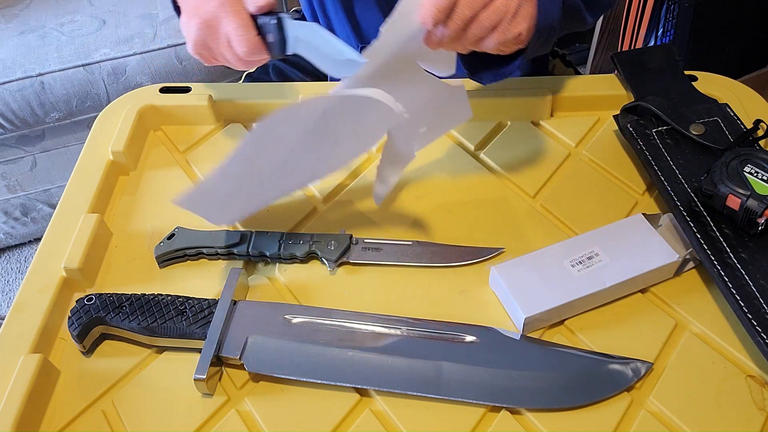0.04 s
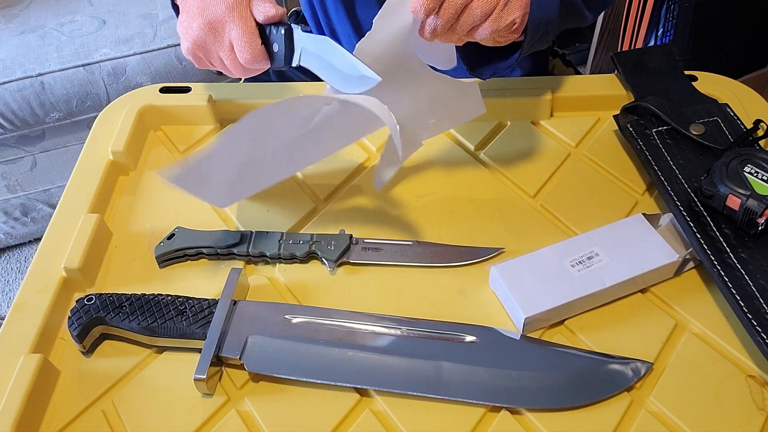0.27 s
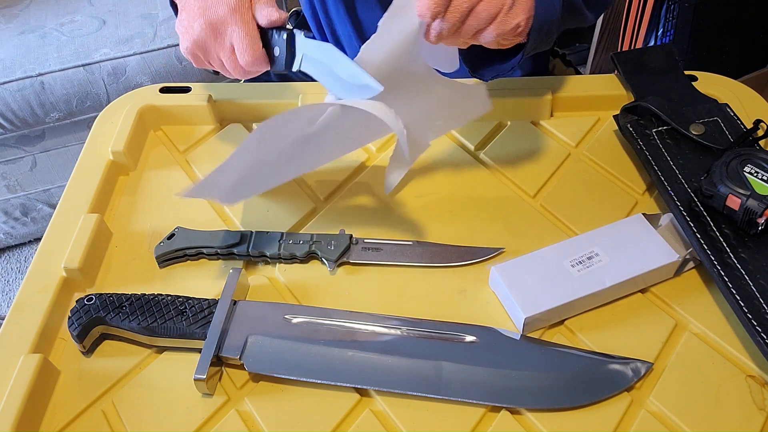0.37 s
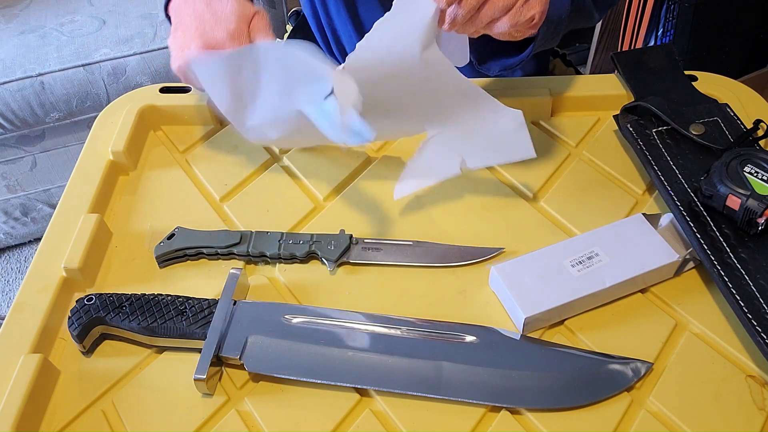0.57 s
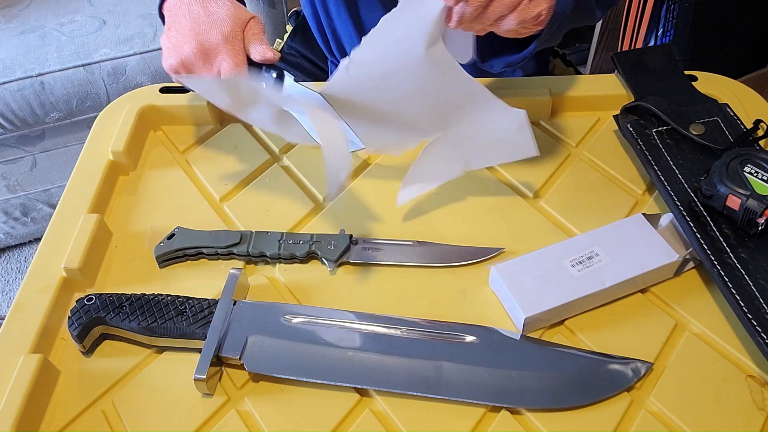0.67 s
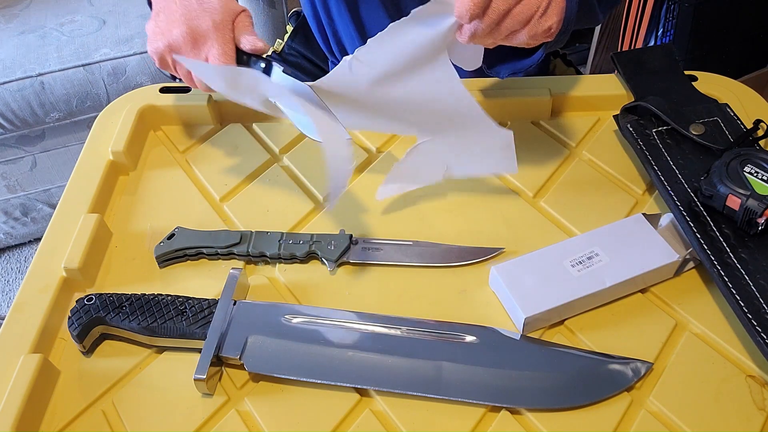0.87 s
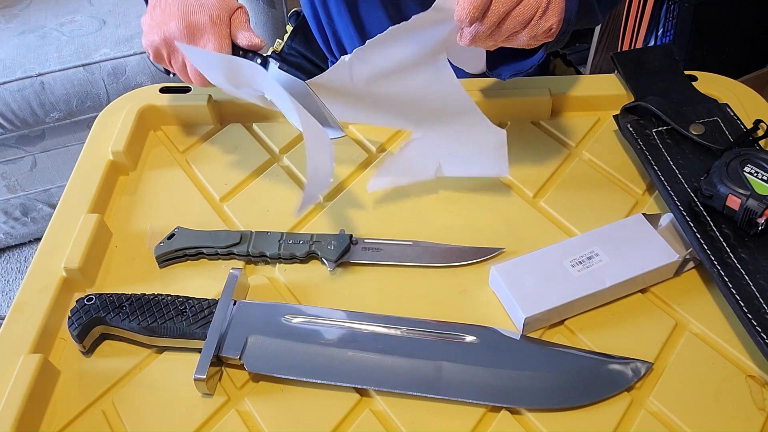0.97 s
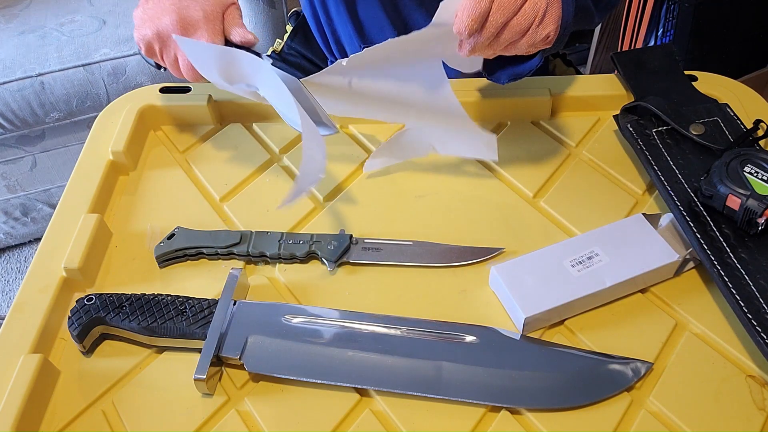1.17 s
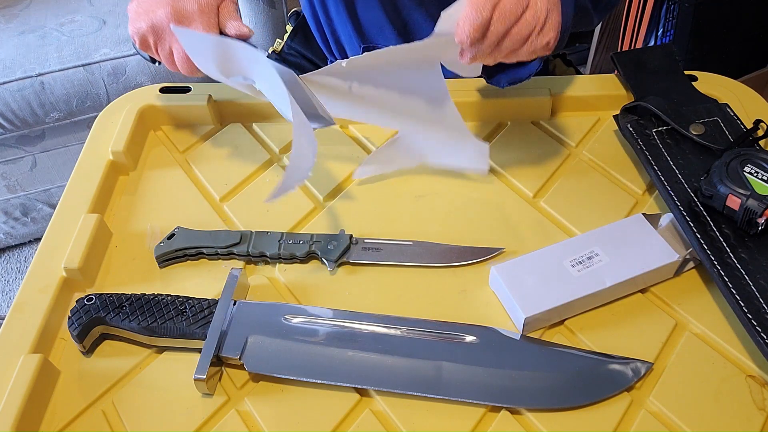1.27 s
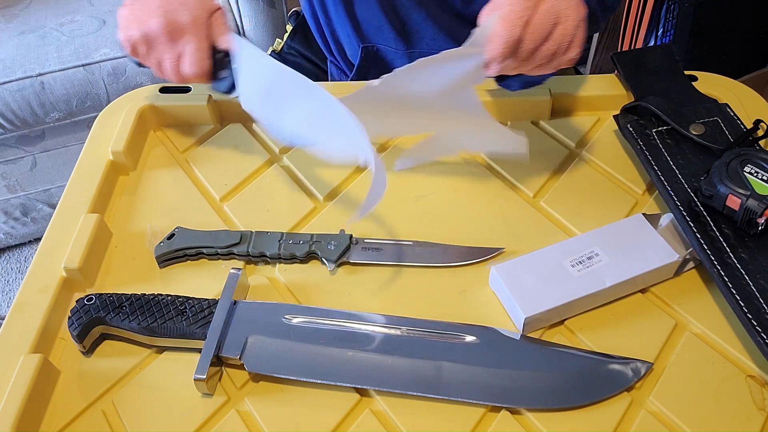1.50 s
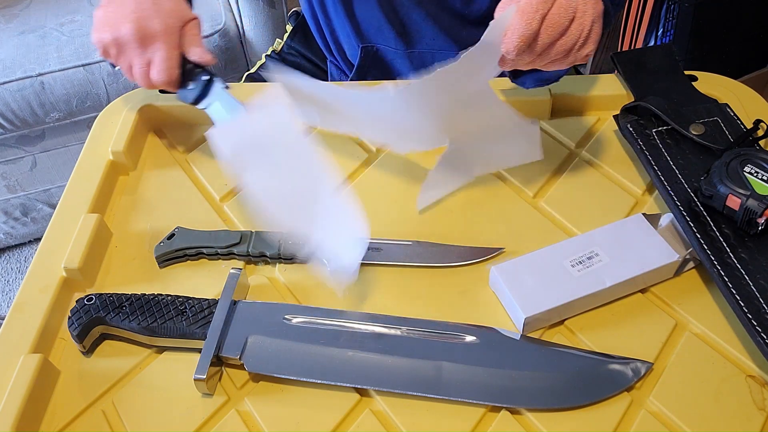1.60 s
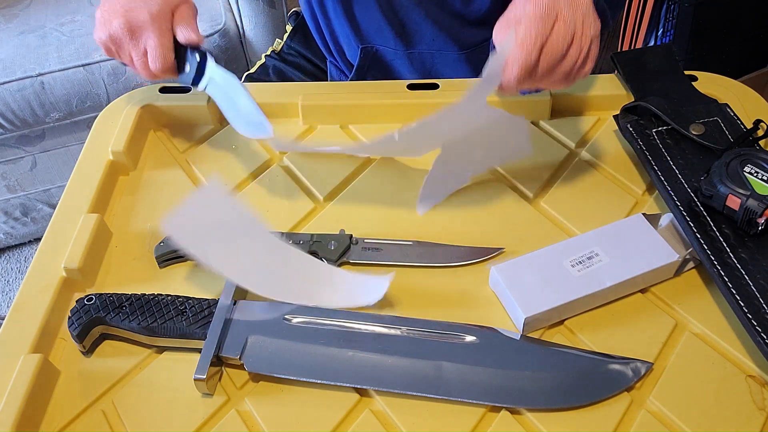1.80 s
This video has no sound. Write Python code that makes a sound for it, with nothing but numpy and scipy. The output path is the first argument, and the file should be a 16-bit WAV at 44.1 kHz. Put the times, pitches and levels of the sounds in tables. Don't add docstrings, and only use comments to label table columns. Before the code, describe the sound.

Paper being sawn and torn by a blade, crackling in uneven pulls, heard close up indoors

```python
import sys
import numpy as np
from scipy import signal
from scipy.io import wavfile
from scipy.ndimage import uniform_filter1d

SR = 44100
rng = np.random.default_rng(int(sys.argv[2]) if len(sys.argv) > 2 else 0)


def pcm_store(signal):
    levels = np.round(np.clip(np.atleast_2d(signal), -1, 1) * 32767)
    wavfile.write(sys.argv[1], SR, levels.astype(np.int16).T)


def convert_level_to_amplitude(level_db):
    exponent = np.asarray(level_db, float) / 20
    return 10 ** exponent


N = 81585


def evened(x):
    return x / np.sqrt(np.mean(x ** 2) + 1e-20)


def read(points, hz):
    f, value = np.transpose(points)
    return np.interp(np.log(hz + 1), np.log(f + 1), value)


def colour(x, points):
    hz = abs(np.fft.fftfreq(4096, 1 / SR))
    log_gain = np.log(convert_level_to_amplitude(read(points, hz)))
    spectrum = np.exp(np.conj(signal.hilbert(log_gain)))
    taps = np.fft.ifft(spectrum).real[:2048]
    return signal.oaconvolve(x, taps)[:len(x)]


def resonate(x, hz, width):
    r = np.exp(-np.pi * abs(width) / SR)
    pole = r * np.exp(2j * np.pi * hz / SR)
    return 2 * signal.lfilter([1 - r], [1, -pole], x).real


def wavelet(hz, cycles):
    turns = np.arange(round(4 * abs(cycles) * SR / hz) + 2) * hz / SR
    u = turns / cycles
    return np.sin(2 * np.pi * turns) * u * np.exp(1 - u) * np.exp(-(u / 2) ** 2)


def add(mix, s, sound):
    part = mix[round(s * SR):][:len(sound)]
    part += sound[:len(part)]


def fibres(per_s, spread_db):
    u = rng.random((N, 3))
    size = convert_level_to_amplitude(-spread_db * np.log(u[:, 1] + 0.032))
    return np.sign(u[:, 0] - .5) * size * (u[:, 2] < per_s / SR)


# (time [s], force level [dB], edge fizz against the sheet's body [dB])
ENTRY = [
    (0, -62, 4.5),
    (.06, -60, -0.5),
    (.088, -55, 8.5),
    (.143, -40.5, -4.5),
    (.165, -42.5, -4),
    (.198, -55, 2.5),
]
FIRST = [
    (.198, -40, -10),
    (0.204, -40, -1),
    (0.251, -30.5, -1.5),
    (.27, -40, 1.7),
    (0.29, -53, 2),
    (0.306, -39, -4),
    (0.325, -43.5, 5),
]
SECOND = [
    (0.331, -51.5, 4.5),
    (0.34, -37, 0.5),
    (0.362, -31.5, -0.5),
    (0.391, -31.5, -2.5),
    (0.414, -39, -1),
    (.432, -29, -2),
    (0.444, -39.5, -5),
    (0.493, -42, 5.5),
    (0.551, -39.5, 0),
]
LONG = [
    (0.551, -42.5, -16),
    (0.562, -32.5, 3.5),
    (0.619, -26.5, -1),
    (.67, -30.5, 0.5),
    (0.719, -29, -1.5),
    (.75, -51, -6.5),
    (.785, -73, 10),
    (.797, -61, 6),
    (.81, -64, 2),
]
RIP = [
    (0.811, -46, 10),
    (0.812, -48, 0),
    (0.821, -41, -2),
    (0.825, -34, -2),
    (0.844, -27, -9),
    (0.875, -20.5, -7),
    (0.908, -24, -5.5),
    (0.948, -38.5, -7),
    (1.021, -76, 16),
]
KNOCK = [
    (1.029, -44, -30),
    (1.032, -39, -36),
    (1.05, -41, -21),
    (1.075, -62, -6),
]
STUTTER = [
    (1.074, -69, -0.16),
    (1.082, -42, -1.1),
    (1.096, -41, -0.87),
    (1.106, -73, 0.6),
    (1.124, -49.5, 0.96),
    (1.128, -45, 1),
    (1.174, -38.5, -0.37),
    (1.181, -63, -1),
]
DRAG = [
    (1.251, -57, -10),
    (1.262, -57, 9),
    (1.3, -59.5, 5),
    (1.345, -50.5, -6.5),
    (1.358, -56.5, 10.5),
    (1.422, -60.5, -0.5),
    (1.428, -41.5, -15),
    (1.44, -41, -1),
]
LAST = [
    (1.441, -26, -9.5),
    (1.46, -37.5, -3),
    (1.481, -31, 2.5),
    (1.525, -32.5, 7.5),
    (1.565, -31, 7.5),
    (1.591, -28.5, -7.5),
    (1.622, -38, -10),
    (1.671, -48, 1.5),
]
FALL = [
    (1.67, -48, 1.8),
    (1.685, -46, 2.8),
    (1.72, -45.5, 2.2),
    (1.735, -52, 0.68),
    (1.8, -57, 1.8),
    (1.812, -50, 1.1),
    (1.85, -61.5, 6.1),
]


def sawing():
    t, force, edge = np.arange(N) / SR, np.zeros(N), np.zeros(N)
    for pull in (ENTRY, FIRST, SECOND, LONG, RIP, KNOCK, STUTTER, DRAG, LAST, FALL):
        s, db, bite_db = np.transpose(pull)
        force = np.maximum(force, convert_level_to_amplitude(np.interp(t, s, db, -120, -120)))
        edge = np.maximum(edge, convert_level_to_amplitude(np.interp(t, s, db + bite_db, -120, -120)))
    clump_s, clump_db = .003, 2
    clump = convert_level_to_amplitude(clump_db * evened(resonate(rng.standard_normal(N), 0, 0.67 / clump_s)))
    low = fibres(per_s=4500, spread_db=3) * clump
    high = fibres(per_s=9000, spread_db=2.5) * np.sqrt(clump)
    return low / np.std(low) * force, high / np.std(high) * edge


# (frequency [Hz], level [dB])
BODY = [(70, -31), (170, -14), (320, -7), (560, -5), (1700, -5), (2300, -8.5), (2800, -9), (6000, -52.5)]
# (start time [s], [(frequency [Hz], width [Hz], level [dB])])
SHEET = [
    (0, [(328, 130, -2.5), (645, 23, 6), (790, 33, 6.5), (1150, 40, -2), (1476, 55, 6), (1870, 58, 7), (2250, 50, 7)]),
    (0.548, [(349, 42, 4.5), (810, 120, 0.5), (1030, 130, 0.5), (1436, 20, 6), (1740, 140, 7.5), (2142, 37, 12), (2490, 130, -2)]),
    (.8, [(410, 40, 4), (653, 25, 5), (867, 56, -1), (1450, 58, 0), (1727, 48, 11), (300, 25, 2), (2150, 210, 5)]),
    (1.02, [(317, 74, 12), (1030, 37, -3), (1230, 67, -10), (1880, 190, 8), (2090, 110, 5.5)]),
    (1.448, [(320, 51, 4), (688, 85, 8.5), (1430, 77, 3), (1810, 420, 7.5), (1990, 140, 5), (2640, 100, 8)]),
]


def buckling_sheet(low):
    t, unit, sheet = np.arange(N) / SR, np.eye(1, 4096)[0], np.zeros(N)
    stage = np.searchsorted([s for s, _ in SHEET], t, "right") - 1
    ring_db, grain_cycles, grain_db = 2.5, 0.63, -10
    for k, (_, modes) in enumerate(SHEET):
        rings = sum(convert_level_to_amplitude(db) * resonate(unit, hz, width) for hz, width, db in modes)
        body = evened(colour(unit, BODY)) + convert_level_to_amplitude(ring_db) * evened(colour(rings, BODY))
        sheet += signal.oaconvolve(low * (stage == k), body / np.linalg.norm(body))[:N]
    patch = rng.integers(0, 16, N)
    for k, hz in enumerate(np.geomspace(330, 2250, num=16)):
        grain = wavelet(hz, grain_cycles)
        gain = convert_level_to_amplitude(grain_db + read(BODY, hz)) * np.sqrt(hz / 1000) / np.linalg.norm(grain)
        sheet += signal.oaconvolve(low * (patch == k), gain * grain)[:N]
    return 0.72 * sheet


def bending(x):
    z = signal.stft(x, nperseg=256)[2]
    patches = uniform_filter1d(rng.standard_normal(z.shape), size=9, axis=0)
    patches = uniform_filter1d(patches, size=16, axis=1)
    return signal.istft(z * convert_level_to_amplitude(2.2 * evened(patches)), nperseg=256)[1][:N]


# (frequency [Hz], level [dB])
FIZZ = [(1500, -19), (2800, 0.5), (5000, -1.5), (7800, -0.5), (8600, -8), (11500, -1.5), (15600, -1)]
# (frequency [Hz], width [Hz], level [dB])
EDGE = [(4340, 490, 4), (5600, 2200, 11.5)]


def fizzing_edge(high):
    unit = np.eye(1, 4096)[0]
    bands = sum(convert_level_to_amplitude(db) * resonate(unit, hz, width) / np.sqrt(width) for hz, width, db in EDGE)
    fizz = evened(colour(unit, FIZZ)) + convert_level_to_amplitude(-8) * evened(bands)
    return bending(signal.oaconvolve(high, fizz / np.linalg.norm(fizz))[:N])


# (frequency [Hz], level [dB])
HUSH = [(30, -4), (70, 1), (250, -30), (1500, -28), (9000, -21), (16000, -16)]


def room_hush():
    return convert_level_to_amplitude(-65) * evened(colour(rng.standard_normal(N), HUSH))


# (time [s], peak level [dB], ring frequency [Hz], length [cycles])
SNAPS = [(.086, -46, 1100, 1.5), (.132, -36, 1000, 1.5), (.1418, -25, 1480, 2.4), (.175, -37, 1400, 2),
         (.204, -33, 1070, 1.1), (.214, -30, 600, 1.1), (.2472, -21.5, 1250, 1.8), (.2485, -27, 2400, 1.5),
         (.251, -24, 1400, 1.1), (.3, -33, 1750, 1.5), (.339, -30, 2430, 2), (.3555, -27, 1400, 1.5),
         (.361, -27, 1150, 1.5), (.3865, -25, 1450, 1.5), (.43, -26, 1300, 1.5), (.49, -32, 1780, 1.5),
         (.562, -26, 1800, 1.1), (.57, -27, 1050, 1.5), (.58, -25, 1700, 1.5), (.593, -25, 1500, 1),
         (.628, -25, 1300, 1), (.641, -24, 1750, 1.8), (.798, -52, 1070, 1.1), (.811, -36, 1990, 1.1),
         (.827, -20, 1500, 1.1), (.834, -25, 800, 1.5), (.8365, -25, 1880, 1.5), (.844, -20, 1500, .8),
         (.857, -17, 1800, 1), (.859, -12, 1650, 1.1), (.868, -12, 1700, 1.5), (.8728, -12.5, 2050, 2),
         (.8752, -13, 1950, 1.3), (.881, -19, 800, 1.1), (.8835, -16, 1200, .8), (.887, -17, 950, .9),
         (.892, -19, 1600, 1.8), (.897, -20, 850, 1.2), (.9035, -17, 1550, 2), (.91, -21, 1400, 1.1),
         (1.1255, -25, 1900, 1.3), (1.033, -36, 1080, 4), (1.478, -31, 320, 1.5), (1.565, -29, 650, 3.5),
         (1.584, -30, 1730, 5), (1.74, -43, 2100, 2)]
# (time [s], peak level [dB], ring
# frequency [Hz], crack level [dB], rattle level [dB])
CATCHES = [(.306, -34.5, 1414, 3, -17), (1.0318, -33, 1670, -32, -8), (1.125, -32.5, 1260, 3.5, -8),
           (1.143, -27, 2170, -21, -33), (1.152, -28, 2150, -6, -13), (1.1645, -31.5, 960, -3.5, -5.5),
           (1.221, -36.5, 2080, 2.5, -10), (1.2715, -39.5, 2300, 2, -8), (1.309, -22, 1790, -10, -16),
           (1.3463, -20, 1130, -4.5, -5), (1.405, -43, 783, -22, 5), (1.4408, -15, 1260, -6.5, -24.5),
           (1.477, -51, 1900, -11, -16), (1.56, -30.5, 670, 14.5, -25), (1.639, -33, 1150, -7.5, -2),
           (1.681, -32, 1770, -0.5, -3.5), (1.711, -42.5, 2230, 9.5, -6), (1.848, -39.5, 2630, 0.5, -5)]
# (frequency [Hz], level [dB])
CRACK = [(700, -18.5), (1500, -3.5), (3300, -3), (4800, 1), (6100, -8), (7200, -2), (9000, -13),
         (16000, -13.5)]


def snaps():
    out, t = np.zeros(N), np.arange(4000) / SR
    crack_t60, rattle_t60, rattle_rise_s, rattle_width_hz = .008, .055, 0.0031, 2400
    rows = [(*row, 1.1) for row in CATCHES]
    rows += [(s, db, hz, -13, -23, cycles) for s, db, hz, cycles in SNAPS]
    for s, db, hz, crack_db, rattle_db, cycles in rows:
        crack_noise, rattle_noise, lump_noise = rng.standard_normal((3, 4000))
        crack = evened(colour(crack_noise + 5 * (t == 0), CRACK))
        crack *= convert_level_to_amplitude(crack_db - 60 * t / crack_t60)
        lumps = convert_level_to_amplitude(2.5 * evened(resonate(lump_noise, 0, 120)))
        rattle = evened(colour(resonate(rattle_noise * lumps, hz, rattle_width_hz), BODY))
        rattle *= np.minimum(t / rattle_rise_s, 1) * convert_level_to_amplitude(rattle_db - 60 * t / rattle_t60)
        add(out, s, convert_level_to_amplitude(db) * (crack + rattle))
        add(out, s, convert_level_to_amplitude(db) * 1.3 * wavelet(hz, cycles))
    return out


# (frequency [Hz], width [Hz], level [dB])
BLADE = [(7000, 60, -16), (7250, 130, -5.5), (7780, 60, -10), (7980, 83, -8.5)]
# (start [s], top [s], end [s])
BLADE_S = (1.4, 1.55, 1.59)


def singing_blade(high):
    drive = np.interp(np.arange(N) / SR, BLADE_S, [0, 1, 0]) * high
    return sum(convert_level_to_amplitude(db) * np.sqrt(SR / width / 10) * resonate(drive, hz, width) for hz, width, db in BLADE)


def thump():
    out, t = np.zeros(N), np.arange(8000) / SR
    land_s, level_db, t60, rise_s = 1.716, -44.5, 0.1, 0.0016
    tone = sum(gain * np.sin(2 * np.pi * hz * t) for hz, gain in ((242, 1), (150, 0.45), (400, 0.4)))
    for late_s, db in ((0, 3.5), (.024, -3)):
        add(out, land_s + late_s, tone * np.minimum(t / rise_s, 1) * convert_level_to_amplitude(level_db + db - 60 * t / t60))
    return out


# (frequency [Hz], side level [dB])
APART = [(40, -26), (200, -17.5), (500, -9.5), (1200, -9), (2800, -1.5), (5000, -1), (16000, -1)]


def ports(x):
    z = signal.stft(x, nperseg=128, noverlap=96)[2]
    scrambled = z * np.exp(2j * np.pi * rng.random(z.shape))
    side = signal.istft(scrambled, nperseg=128, noverlap=96)[1][:N]
    side = colour(side * np.std(x) / np.std(side), APART)
    return np.array([x + side, x - side])


# (frequency [Hz], t60 [s])
ROOM = [(300, 0.28), (2000, 0.15), (12000, 0.15)]


def room(x):
    taps = np.zeros((2, 22000))
    at = np.arange(200, 21980, 20) + rng.integers(0, 20, (2, 1089))
    np.put_along_axis(taps, at, rng.choice([-1., 1.], at.shape), 1)
    hz, t, z = signal.stft(taps, SR, nperseg=256)
    tail = signal.istft(z * convert_level_to_amplitude(-60 * t / read(ROOM, hz)[:, None]), SR, nperseg=256)[1]
    tail /= np.linalg.norm(tail[0])
    mid, side = convert_level_to_amplitude(-12) * signal.fftconvolve(x[None], tail, axes=1)[:, :N]
    return mid + colour(side, APART) * np.array([[1], [-1]])


def scene():
    low, high = sawing()
    paper = buckling_sheet(low) + fizzing_edge(high) + snaps() + singing_blade(high) + thump()
    return ports(paper + room_hush()) + room(paper)


def top_cut(x):
    return signal.sosfilt(signal.butter(12, 16990, fs=SR, output="sos"), x)


def record(dry):
    bass_cut = signal.butter(2, 48.5, "high", fs=SR, output="sos")
    treble_cut = signal.firwin(511, 15750, window=("kaiser", 9), fs=SR)
    thin = signal.sosfilt(bass_cut, dry)
    return top_cut(signal.oaconvolve(thin, treble_cut[None], "same"))


dry = scene()
out = record(dry)
pcm_store(out)
```